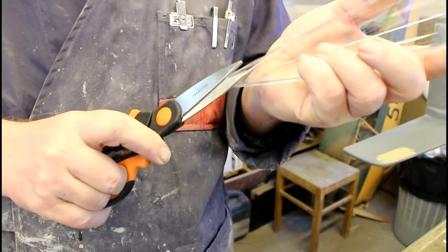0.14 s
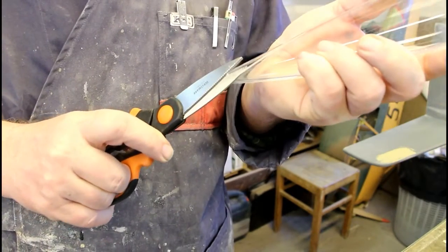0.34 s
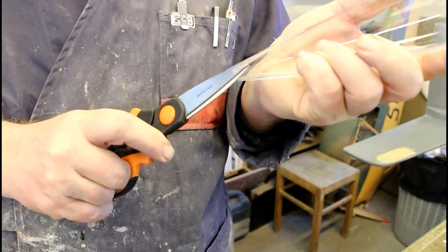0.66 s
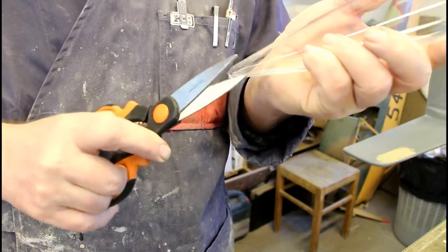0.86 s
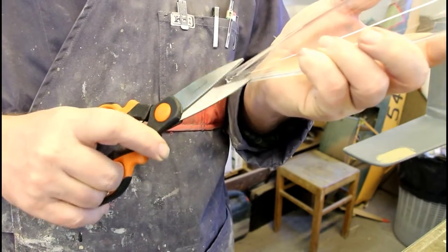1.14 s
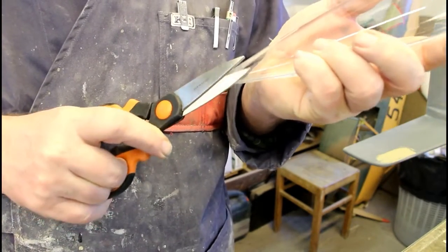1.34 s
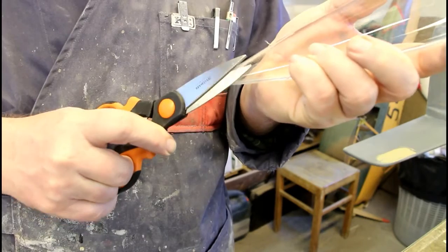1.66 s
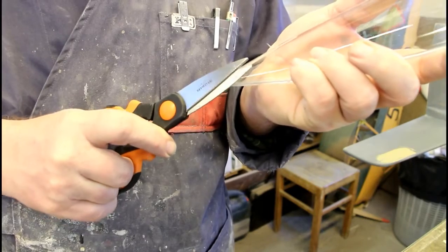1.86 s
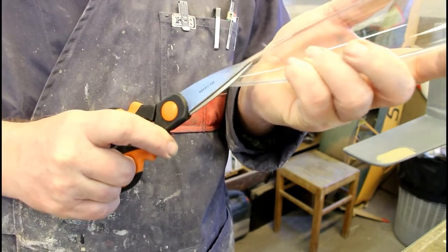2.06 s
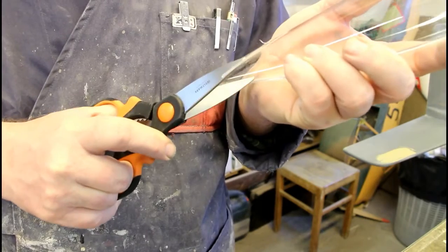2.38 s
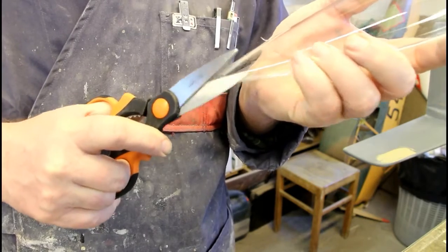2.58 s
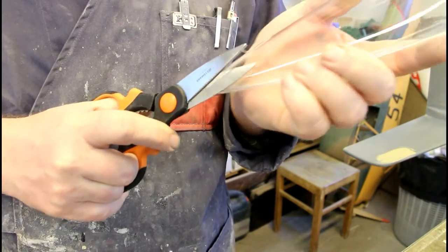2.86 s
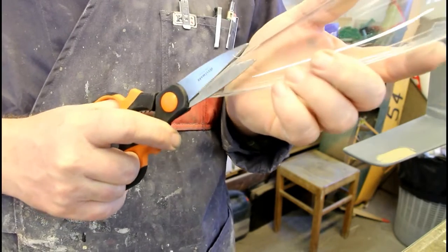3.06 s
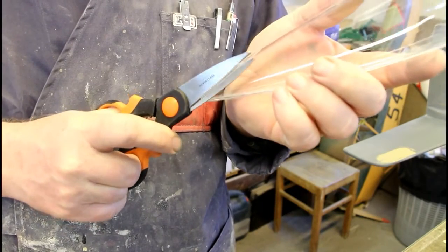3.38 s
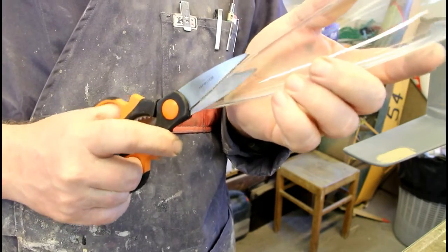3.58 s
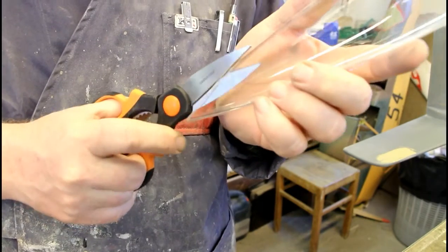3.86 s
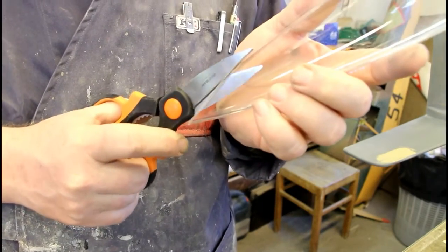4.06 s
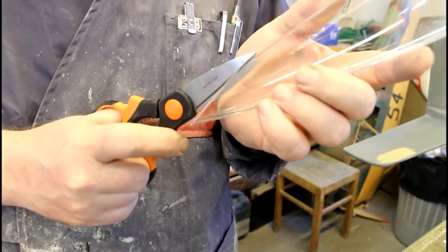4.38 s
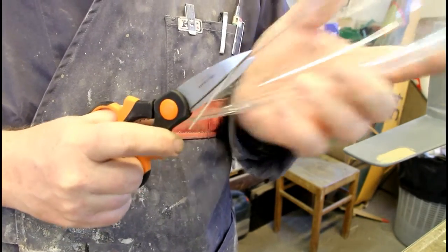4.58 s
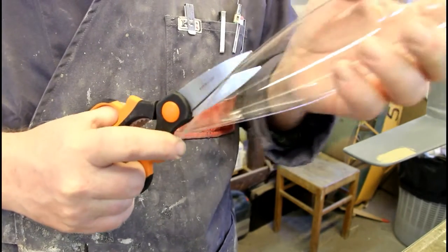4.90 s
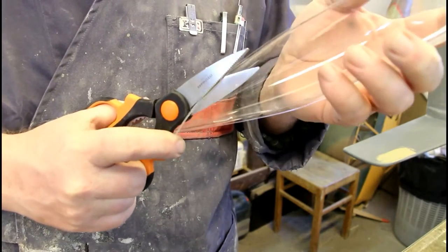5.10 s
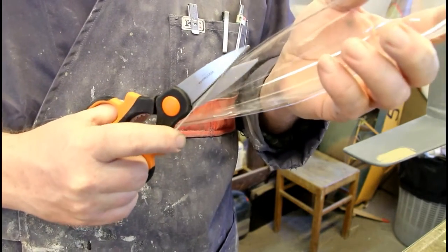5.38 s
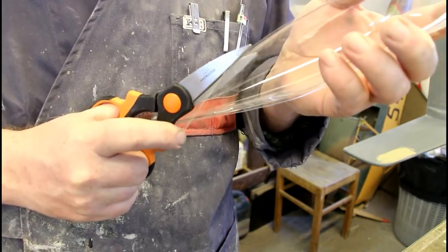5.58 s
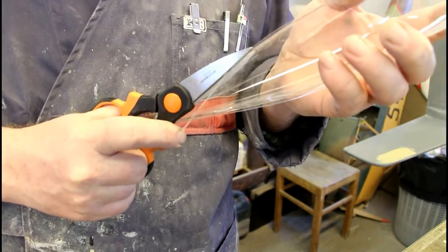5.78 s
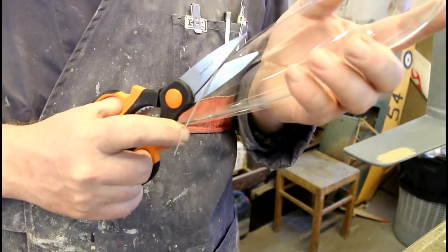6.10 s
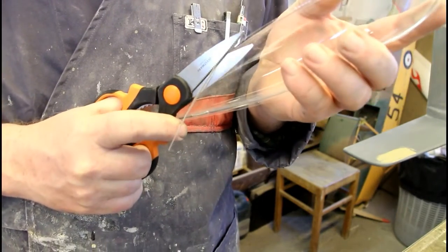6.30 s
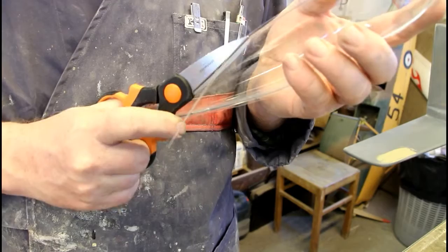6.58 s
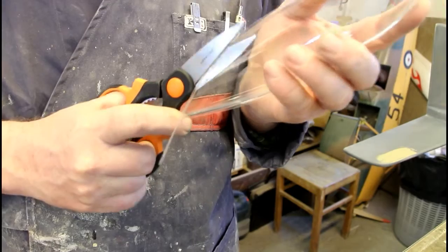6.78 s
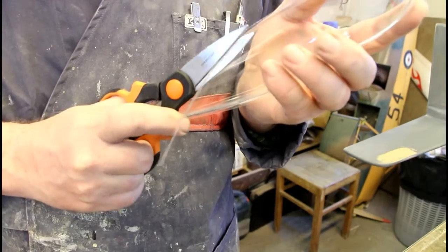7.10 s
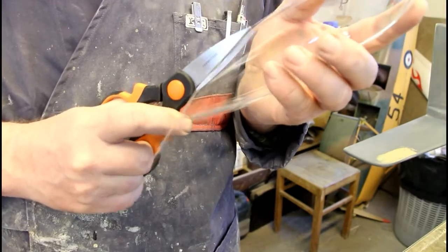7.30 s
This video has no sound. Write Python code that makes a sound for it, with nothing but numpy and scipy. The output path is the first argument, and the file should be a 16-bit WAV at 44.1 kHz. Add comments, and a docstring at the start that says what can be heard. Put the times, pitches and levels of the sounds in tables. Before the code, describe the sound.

Scissors cut a thin stiff plastic sheet close up, with sharp snaps, crunchy scrapes, soft rustling and later creaky tick runs in a small workshop.

```python
"""Cutting a stiff plastic sheet

Scissors cut a thin stiff sheet, close up, in a small workshop.
The strokes are runs of micro-fractures and the cracks single snaps, all ringing resonant modes of the sheet;
later the plastic binds and creaks by stick-slip, as ticks ringing the modes of the pinched sheet.
Sheet, hands and sleeves rub as gated noise with tiny scratches. A short rasp and two steel ticks are heard.
Near reflections and a diffuse tail follow the cutting, over faint noise of the room and a sine hum."""
import sys
import numpy as np
from scipy import signal
from scipy.fft import rfft, irfft, next_fast_len
from scipy.io import wavfile

SR = 44100
rng = np.random.default_rng(int(sys.argv[2]) if len(sys.argv) > 2 else 0)


def store_pcm(level_fs):
    """Save levels as 16-bit WAV."""
    pcm = np.round(np.clip(level_fs, -1, 1) * 32767).astype(np.int16)
    wavfile.write(sys.argv[1], SR, np.atleast_2d(pcm).T)


N = 328545
TIME = np.arange(N) / SR
RING_TIME = TIME[:1024]

# Levels of slides, strokes, slips and fractures are relative: their sources add an overall level.
# Rasps and steel touches have their dry levels, before panning and room.
# Body is the sound below BODY_HZ, edge that above EDGE_HZ; both levels are against the band between.
BODY_HZ, EDGE_HZ = 1700, 4500
CUTOFF_HZ = 16700
CONTACT_HZ = 13000   # a fracture lasts a moment, which softens the very top
LEAD_S = .0003   # rings begin this late, leaving room for either microphone to lead

# Spectrum of the still room: [f/Hz, relative density level/dB]
AIR_SPECTRUM = [(50, -28), (120, -14.5), (220, -3), (400, -2.5), (800, -0.5), (2200, -4), (4000, -7),
                (8000, -13), (16000, -23.5)]
AIR_DB = -55.5   # rms
HUM_HZ, HUM_DB = 100, -87   # rms level

# Near reflections from body and bench: [delay t/s, left level/dB, right level/dB]
REFLECTIONS = [(0.0047, -19, -10.5), (0.013, -20.5, -27), (0.023, -27, -36.5)]
# Spectrum of the room tail at its onset: [f/Hz, relative density level/dB]
TAIL_SPECTRUM = [(60, -10.5), (300, 5.5), (1000, 0), (3000, 8), (7000, 4.5), (16000, -7.5)]
# Reverberation time, for a decay of 60 dB: [f/Hz, t60/s]
TAIL_T60 = [(100, 0.38), (1000, 0.28), (3000, 0.22), (8000, 0.26), (16000, 0.38)]

# Slides of sheet, hands and sleeves: [start t/s, length t/s, rustle level/dB, hiss level/dB]
SLIDES = [(0, 0.0067, -50.5, -41), (0.442, .14, -77, -58), (0.782, 0.014, -50.5, -52),
          (1.428, 0.068, -54.5, -64), (2.197, 0.13, -53, -63), (2.704, 0.22, -48, -53),
          (3.267, 0.14, -54, -56.5), (3.436, 0.37, -55.5, -81), (3.738, 0.17, -41, -44.5),
          (3.961, 0.021, -47, -63), (4.069, 0.07, -50, -50.5), (4.189, .16, -49, -48),
          (4.557, .17, -48.5, -44.5), (4.822, 0.21, -53, -54.5), (5.372, 0.32, -54, -57.5),
          (5.832, .19, -47, -51.5), (6.168, 0.099, -52, -63), (6.314, 0.33, -47, -57),
          (6.684, 0.096, -48.5, -51.5), (6.918, 0.093, -57.5, -82), (7.021, 0.29, -48.5, -67),
          (7.306, .1, -38, -45.5)]
# Spectra of rubbing, dull and bright: [f/Hz, relative density level/dB]
RUSTLE_SPECTRUM = [(60, -24.5), (150, -22.5), (300, -12), (550, -0.5), (1100, 1.5), (1900, -0.5),
                   (3200, -1.5), (8000, -38.5)]
HISS_SPECTRUM = [(1500, -13.5), (3000, 10), (4500, 5), (6500, 4), (9500, -4.5), (12500, -13), (16000, -28)]
RUB_ATTACK_S, RUB_RELEASE_DB_PER_S = 0.016, 222
HOLD_DB, HOLD_WAVER_DB = -68.5, 2.5   # the held sheet never stops rustling faintly; relative as the slides

# Rasps of the blade along the cut edge: [start t/s, length t/s, rms level/dB]
EDGE_RASPS = [(1.898, 0.076, -44.5)]
# Touches of the steel edges: [t/s, peak level/dB]
STEEL_TOUCHES = [(6.9206, -24), (6.9403, -24)]

# Bites and scrapes of the blades:
# [start t/s, swell t/s, fade t/s, level at the height/dB, body level/dB, edge level/dB]
BLADE_STROKES = [(0, 0.00099, 0.034, -36.5, -3.5, -5), (.131, 0.0046, 0.036, -44.5, -1, -5),
                 (.49, .052, 0.0064, -39.5, -6.5, -11), (.738, 0.021, .009, -37, -4, -13),
                 (.835, 0.0042, 0.0067, -22.5, -1, -12), (.962, 0.0078, 0.023, -41.5, -5, -19),
                 (1.226, 0.0052, .012, -27, -6, -7), (1.251, 0.0018, 0.024, -24, -8.5, -12.5),
                 (1.275, 0.025, 0.029, -38.5, -4, -5), (1.56, 0.02, .05, -27.5, -7.5, -9),
                 (1.595, 0.025, .025, -27.5, -10, -11), (1.898, 0.0054, 0.069, -35.5, -5, -6),
                 (2.148, 0.0036, 0.019, -31.5, -7.5, -18), (2.315, 0.0022, 0.022, -41, 3, 1),
                 (2.559, 0.007, 0.0064, -32, -2.5, -12), (2.795, 0.053, 0.021, -25.5, -9, -11.5),
                 (3.018, 0.011, .045, -32.5, -1, -4.5), (3.166, 0.011, .085, -29, -2.5, -7),
                 (3.524, 0.0086, 0.075, -37.5, 10.5, -32), (3.606, 0.011, 0.079, -20, 2, -10),
                 (3.743, .044, 0.019, -28.5, -4.5, -29), (3.803, 0.012, 0.017, -23.5, -12, -19),
                 (3.862, 0.013, 0.051, -31, -4.5, -6.5), (4.215, 0.047, 0.015, -25, -0.5, -13),
                 (4.508, 0.0047, 0.042, -29, -7.5, -18.5), (4.848, 0.0071, .022, -30, -0.5, -8),
                 (4.9, 0.015, 0.038, -30.5, 1.5, -16), (5.246, 0.03, 0.026, -43, 4.5, -12),
                 (5.384, .014, 0.011, -34.5, -3, -2.5), (5.66, .038, 0.029, -28.5, 4, -1.5),
                 (6.494, 0.015, 0.041, -34, -6, -6), (6.574, .005, 0.012, -23, -6, -12.5),
                 (6.699, 0.038, 0.019, -28.5, 1.5, -30), (6.749, 0.025, 0.052, -28.5, 1, -24),
                 (7.032, 0.0057, 0.013, -25, 2, -8.5), (7.158, .017, 0.033, -27.5, 4, -4.5),
                 (7.305, 0.03, 0.015, -30.5, 2.5, -43), (7.33, 0.019, 0.072, -25.5, 2.5, -19),
                 (7.419, 0.021, 0.021, -31.5, 6, -30)]
STROKE_DROP_DB = 14.5   # blade pressure at either end of a stroke, below its height
FRACTURES_PER_S = 370
FLAP_HZ, FLAP_DB_PER_OCTAVE = 1730, 24   # a longer cut flap rings lower and gives more body

# Plastic sticking and slipping on the blade, in runs of jerks:
# [start t/s, number of jerks, first gap t/s, peak level of first jerk/dB]
STICK_SLIPS = [(5.3972, 2, .0074, -18), (5.5197, 2, .0423, -16.5), (5.6444, 2, .0088, -25),
               (5.6725, 4, .007, -27), (5.9123, 2, .0261, -25), (6.1962, 2, .0239, -22.5),
               (6.368, 2, .0179, -15.5), (6.412, 2, .0048, -16), (6.4562, 1, 0, -16),
               (6.5024, 5, .006, -15), (7.058, 5, .0088, -14.5), (7.1626, 6, .005, -17.5),
               (7.2302, 1, 0, -17)]
JERK_GAP_GROWTH, JERK_LOSS_DB = 1.25, 0.56   # as the binding eases, each jerk comes later and weaker
# Modes of the sheet pinched between the blades: [f/Hz, bandwidth/Hz, relative level/dB]
PINCHED_MODES = [(514, 91, -10.5), (734, 127, -8), (1420, 224, -1), (1995, 203, 1), (2403, 78, -0.5),
                 (3070, 210, -6), (4280, 67, -8.5), (5150, 130, -12.5), (6870, 1000, -23.5),
                 (8500, 180, -17), (10440, 360, -19), (12300, 630, -57)]

# Fractures of the sheet: [t/s, peak level/dB, body level/dB, edge level/dB]
FRACTURES = [(0.544, -30, -8, -7), (0.5758, 3.5, -8.5, -8), (0.761, -24, 1, -23), (0.8394, -15.5, -5, 6),
             (0.9612, -25, -3, -15), (1.1083, -16, 0.5, -9), (1.238, -16, -5, -2.5),
             (1.2727, -7, -10.5, -15), (1.8987, -25, -17, -5.5), (2.0143, 4, -8.5, -6.5),
             (2.1514, -22.5, -12, -28), (2.3147, -25.5, -8, -4.5), (2.7032, -14.5, -8.5, -12),
             (2.9468, 3.5, -10, -11.5), (2.9595, -11, -3, -21), (3.196, -13.5, 8, -14), (3.201, -21, 2, -6),
             (3.2159, -12.5, 9.5, -14), (3.2302, -17.5, 9, -7), (3.2549, -17, 7, -2.5),
             (3.3014, -28, 16, -8), (3.6058, -8, -4, -2), (3.61, -6, -20, -14), (3.65, -11.5, -1, -3),
             (3.81, -9.5, -13.5, -16), (4.1088, -19.5, 6, -4.5), (4.262, -10.5, -5, -7.5),
             (4.367, -21.5, 1.5, -3.5), (4.5162, -27, 3, -17), (4.609, -20, 3, -7), (4.6945, -27, 8.5, -13),
             (4.8405, -22.5, 23, -4), (4.91, -22, 0, -10), (6.8003, -14.5, 20, -6), (7.326, -13.5, 0, -36),
             (7.3843, -13.5, 3, -10)]
# Modes of the sheet as it cracks: [f/Hz, bandwidth/Hz, relative level/dB]
SHEET_MODES = [(70, 99, -30), (313, 136, -15), (517, 99, -6.5), (853, 333, -7.5), (1099, 192, -2),
               (1413, 447, -8), (2140, 340, -4.5), (2742, 270, -4.5), (3378, 467, -4), (4500, 1500, -7),
               (5660, 940, -6.5), (7800, 3000, -17.5), (10580, 400, -22.5), (13300, 2200, -31)]


def from_db(db):
    """Amplitude ratio: a level of 20 dB is a factor of ten."""
    return 10 ** (np.asarray(db) / 20)


def rms_one(x):
    """Normalisation of power: scale to rms 1."""
    return x / np.sqrt(np.mean(x ** 2) + 1e-20)


def at_hz(points, hz):
    """Interpolation of a spectrum on a logarithmic frequency axis."""
    f, value = np.transpose(points)
    return np.interp(np.log(hz), np.log(f), value)


def drift(rate):
    """Slow random fluctuation of rms 1: chance values, rate of them per second, joined by lines."""
    count = int(8 * rate) + 2
    return rms_one(np.interp(TIME * rate, np.arange(count), rng.standard_normal(count)))


def add(out, s, sound):
    """Superposition: mix a short stereo sound in at time s."""
    at = max(round(s * SR), 0)
    out[:, at:at + sound.shape[1]] += sound[:, :N - at]


def highpass(x, hz, order):
    """Removal of the slow part of a motion by a Butterworth filter."""
    return signal.sosfilt(signal.butter(order, hz, "high", fs=SR, output="sos"), x)


def noise_bands(size):
    """Band analysis of noise: half octaves, unrelated in two channels, as (centre Hz, band)."""
    edges = np.geomspace(25, 17000, 20)
    white = rng.standard_normal((2, 2, size))
    for k, (low, high) in enumerate(zip(edges, edges[1:])):
        band_filter = signal.butter(2, [low, high], "band", fs=SR, output="sos")
        yield np.sqrt(low * high), signal.sosfilt(band_filter, white[k % 2])   # neighbours differ


def coloured_noise(spectrum, patchy_db, alike):
    """Broadband noise of rms 1 whose bands flicker; mid and side power set the stereo likeness."""
    mid, side = sum(band * from_db(at_hz(spectrum, hz) + patchy_db * drift(40))
                    for hz, band in noise_bands(N))
    return rms_one(np.sqrt(1 + alike) * mid + np.sqrt(1 - alike) * side * [[1], [-1]])


def ring(modes, detune, vary_db, spread):
    """Modal resonance: one snap rings every mode; bending shifts them, and the microphones hear them apart."""
    hz, width, db = np.transpose(modes)[:, :, None]
    chance = rng.standard_normal((3, len(modes), 1))
    hz = hz * (1 + detune * chance[0])
    sign = (-1) ** np.arange(len(modes))[:, None]   # neighbouring modes start in opposite phase
    gain = width * from_db(db + vary_db * chance[1]) * sign

    # The lag between the microphones shrinks slower than the period: high modes are more out of step
    lag_limit = spread / (2 * np.pi * np.sqrt(np.maximum(hz, BODY_HZ) * EDGE_HZ))
    lag = np.array([1, -1])[:, None, None] * lag_limit * np.tanh(chance[2])

    jw = 2j * np.pi * np.arange(len(RING_TIME) // 2 + 1) / len(RING_TIME) * SR
    peaks = gain * jw / (jw ** 2 + 2 * np.pi * width * jw + (2 * np.pi * hz) ** 2)
    rings = irfft(np.sum(peaks * np.exp(-jw * (lag + LEAD_S)), axis=1))
    return signal.sosfilt(signal.butter(2, CONTACT_HZ, fs=SR, output="sos"), rings)


def recolour(x, body_db, edge_db):
    """Spectral balance: a smooth tilt brings body and edge toward their levels; the bass stays."""
    size = next_fast_len(x.shape[1] + 256)
    spectrum = rfft(x, size)
    hz = np.arange(size // 2 + 1) * SR / size + 1   # 1 Hz up, to keep the logarithm finite
    band = np.digitize(hz, [BODY_HZ, EDGE_HZ])
    for _ in range(2):   # the bands overlap in the tilt, so approach in two steps
        power = np.sum(np.abs(spectrum) ** 2, axis=0)
        now_db = 10 * np.log10(np.bincount(band, power))
        tilt_db = np.array([body_db, 0, edge_db]) - now_db + now_db[1]
        tilt = list(zip([250, 1200, 2500, 7000], [0, *tilt_db]))
        spectrum = spectrum * from_db(at_hz(tilt, hz))
    return irfft(spectrum, size)[:, :x.shape[1]]


def flap_pitch(body_db):
    """Length and pitch: the more body a cut has, the longer its flap and the lower it rings."""
    return np.clip(FLAP_HZ * 2 ** (-body_db / FLAP_DB_PER_OCTAVE), 600, 4500)


def flap(x, hz, boost_db, q):
    """Resonance of a free flap: it lifts one pitch, set by its length."""
    b, a = signal.iirpeak(hz, q, fs=SR)
    return x + (from_db(boost_db) - 1) * signal.lfilter(b, a, x)


def room_air():
    """Ambient noise: the still room hisses broadly and almost steadily."""
    return from_db(AIR_DB) * coloured_noise(AIR_SPECTRUM, patchy_db=0.7, alike=-0.12)


def mains_hum():
    """Steady tone: mains hum is one sine, equal in both channels."""
    return from_db(HUM_DB) * rms_one(np.sin(2 * np.pi * HUM_HZ * TIME))


def workshop(x, tail_db, build_s):
    """Reverberation: a few near reflections and a short diffuse tail, decaying separately in each band."""
    t = TIME[:SR * 3 // 4]
    tail = sum(band * from_db(at_hz(TAIL_SPECTRUM, hz) - 60 * t / at_hz(TAIL_T60, hz))
               for hz, band in noise_bands(len(t)))
    tail = rms_one(tail * (1 - np.exp(-t / build_s)))
    response = from_db(tail_db) * tail / np.sqrt(len(t))   # tail_db is its mean energy per channel
    for delay, left_db, right_db in REFLECTIONS:
        response[:, round(delay * SR)] += from_db([left_db, right_db])
    return signal.fftconvolve(x, response, axes=1)[:, :N]


def sliding():
    """Envelope of friction: each slide starts quickly, holds and dies away; gains of rustle and hiss."""
    rustle, hiss = np.zeros((2, N))
    for start, length, rustle_db, hiss_db in SLIDES:
        attack = np.clip((TIME - start) / RUB_ATTACK_S + .5, 0, 1)
        envelope = attack * from_db(-RUB_RELEASE_DB_PER_S * np.clip(TIME - start - length, 0, 1))
        rustle = rustle + from_db(rustle_db) * envelope
        hiss = hiss + from_db(hiss_db) * envelope
    hold = from_db(HOLD_DB + HOLD_WAVER_DB * drift(17))
    return np.hypot(rustle, hold), hiss


def rubbing(rustle_db, hiss_db, scratch_db, scratches_per_s):
    """Friction noise: sliding surfaces rustle and hiss, and the cut edge catches with tiny scratches."""
    rustle, hiss = sliding()
    grip_db = 2.7 * drift(150)
    sizes = from_db(2.6 * rng.standard_normal(N).clip(-2, 2))
    catches = (rng.random(N) < scratches_per_s / SR) * sizes
    scratch = ring(SHEET_MODES, detune=0.016, vary_db=4.5, spread=1.0)
    scratches = rms_one(signal.oaconvolve(catches[None], scratch)[:, :N])
    dull = coloured_noise(RUSTLE_SPECTRUM, patchy_db=2.0, alike=0.78)
    bright = coloured_noise(HISS_SPECTRUM, patchy_db=1.0, alike=0.098)
    return (rustle * from_db(rustle_db + grip_db) * dull
            + hiss * from_db(hiss_db + grip_db) * bright
            + rustle * from_db(scratch_db) * scratches)


def rasps(hz, width_hz, catches_per_s, fade_db):
    """Impulsive friction: rapid catches of the blade ring one bright pitch, fading at an unchanged catch rate."""
    out = np.zeros((2, N))
    for start, length, db in EDGE_RASPS:
        size = round(length * SR)
        fade = from_db(np.linspace(0, -fade_db, size))
        catches = (rng.random(size) < catches_per_s / SR) * rng.standard_normal(size) * fade
        catch = ring([(hz, width_hz, 0)], detune=0, vary_db=0, spread=0.284)
        rasp = signal.fftconvolve(catch, catches[None])
        add(out, start, from_db(db) * rms_one(rasp))
    return out


def blade_ticks(hz, width_hz, lowest_hz):
    """Impact: steel touching steel rings one high, heavily damped mode as a tiny bright tick."""
    out = np.zeros((2, N))
    for s, db in STEEL_TOUCHES:
        tick = ring([(hz, width_hz, 0)], detune=.03, vary_db=0, spread=.3)
        tick = highpass(tick, lowest_hz, order=2)
        add(out, s - LEAD_S, from_db(db) * tick / np.abs(tick.mean(0)).max())
    return out


def crunch(size_db, grind_db, level_db, flap_db, flap_q):
    """Random impulse excitation: a blade breaks the sheet in uneven micro-fractures at three spots."""
    out = np.zeros((2, N))
    for start, swell, fade, db, body_db, edge_db in BLADE_STROKES:
        t = TIME[:round((swell + fade) * SR) + 2]
        gaps = rng.gamma(2, .5, 200)   # mean 1
        sizes = rng.normal(0, 1, 200).clip(-2, 1.5)
        at = ((np.cumsum(gaps) - gaps[0]) * SR / FRACTURES_PER_S).astype(int)
        spot = np.arange(len(at)) % 3   # the fractures take the spots in turn
        inside = at < len(t)

        force = from_db(grind_db) * rng.standard_normal((3, len(t)))
        force[spot[inside], at[inside]] += from_db(size_db * sizes[inside])
        pressure = from_db(np.interp(t, [0, swell, t[-1]], [-STROKE_DROP_DB, 0, -STROKE_DROP_DB]))

        # Each spot rings differently
        grains = sum(signal.fftconvolve(ring(SHEET_MODES, detune=0.061, vary_db=3.0, spread=0.57),
                                        (spot_force * pressure)[None]) for spot_force in force)
        grains = highpass(grains, 520, order=1)   # tiny fractures hardly move the whole sheet
        grains = flap(grains, flap_pitch(body_db), flap_db, flap_q)
        grains = recolour(grains, body_db, edge_db)
        level = np.sqrt(2 * np.sum(pressure ** 2) / np.sum(grains ** 2))   # about rms 1 at the height
        add(out, start - LEAD_S, from_db(db + level_db) * grains * level)
    return out


def slips(level_db):
    """Stick-slip: the pinched sheet lets go in runs of jerks, each with nearly the same hollow tick."""
    out = np.zeros((2, N))
    for s, count, gap, db in STICK_SLIPS:
        for k in range(count):
            tick = ring(PINCHED_MODES, detune=.05, vary_db=3, spread=.25)
            tick = tick / np.abs(tick.mean(0)).max()
            add(out, s - LEAD_S, from_db(db + level_db - JERK_LOSS_DB * k) * tick)
            s += gap * JERK_GAP_GROWTH ** k
    return out


def cracks(level_db, tear_db, tear_s):
    """Brittle fracture: one sharp snap rings the sheet, trailed by a brief tearing at three other spots."""
    out = np.zeros((2, N))
    for s, db, body_db, edge_db in FRACTURES:
        snap = ring(SHEET_MODES, detune=0.011, vary_db=3.5, spread=0.14)
        for _ in range(3):
            force = from_db(tear_db) * rng.standard_normal(len(RING_TIME)) * np.exp(-RING_TIME / tear_s)
            spot_ring = ring(SHEET_MODES, detune=0.054, vary_db=1.5, spread=0.4)
            snap = snap + signal.fftconvolve(spot_ring, force[None])[:, :len(RING_TIME)]
        snap = flap(snap, flap_pitch(body_db), boost_db=7, q=1.9)
        snap = recolour(snap, body_db, edge_db)
        add(out, s - LEAD_S, from_db(db + level_db) * snap / np.abs(snap.mean(0)).max())
    return out


def scene():
    """Superposition of sources: cutting with its reverberation, close rubbing, room noise and hum."""
    air = room_air()
    hum = mains_hum()
    rub = rubbing(rustle_db=0.5, hiss_db=-0.5, scratch_db=-8, scratches_per_s=68)
    cutting = (rasps(hz=4150, width_hz=660, catches_per_s=1500, fade_db=4)
               + blade_ticks(hz=8600, width_hz=1500, lowest_hz=6500)
               + crunch(size_db=3.0, grind_db=-35, level_db=-1.28, flap_db=2, flap_q=4.5)
               + slips(level_db=0.26)
               + cracks(level_db=-2.96, tear_db=-22.5, tear_s=0.0025))
    handling = cutting + workshop(cutting, tail_db=-16.0, build_s=0.001) + rub
    pan_db = -0.1 * np.array([[.5], [-.5]])   # the hands work a little to the right
    return handling * from_db(pan_db) + air + hum


def record(dry):
    """Limits of amplitude and bandwidth: peaks clip at full scale, then the top is cut steeply."""
    top_cut = signal.cheby2(16, 70, CUTOFF_HZ, fs=SR, output="sos")
    return signal.sosfilt(top_cut, np.clip(dry, -1, 1))


dry = scene()
out = record(dry)
store_pcm(out)
```